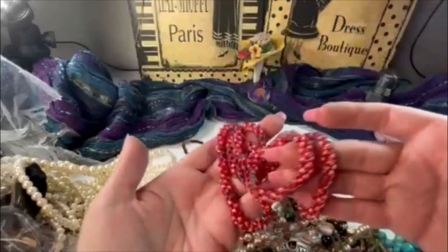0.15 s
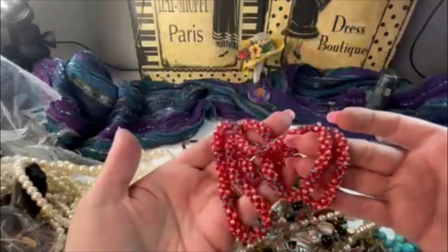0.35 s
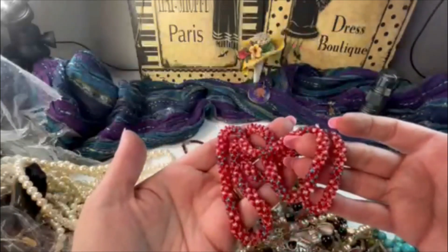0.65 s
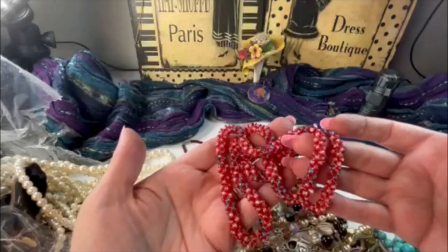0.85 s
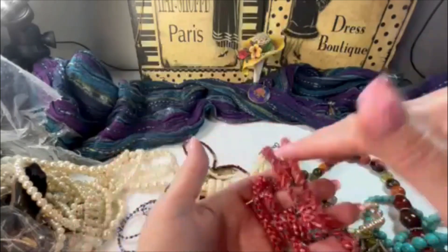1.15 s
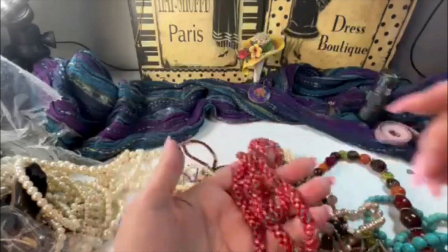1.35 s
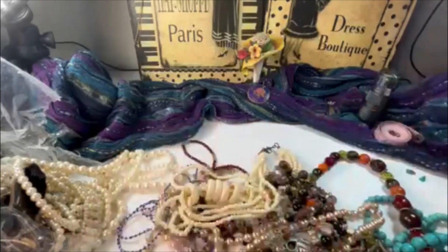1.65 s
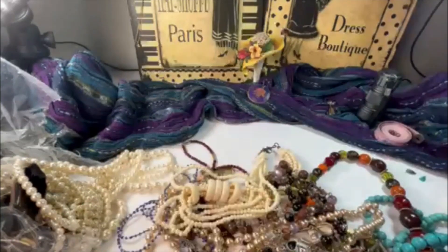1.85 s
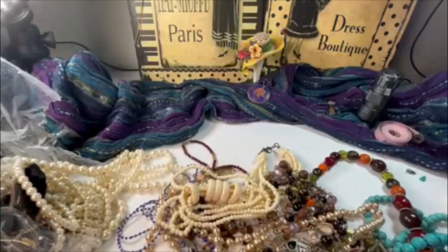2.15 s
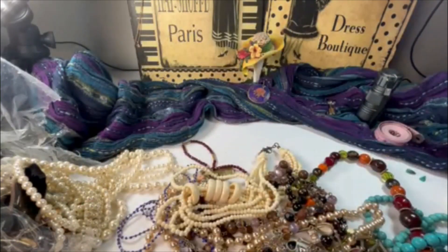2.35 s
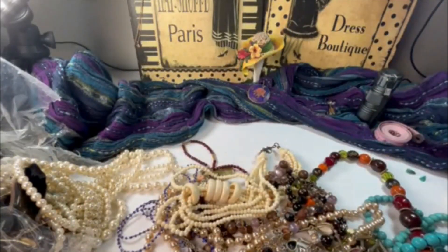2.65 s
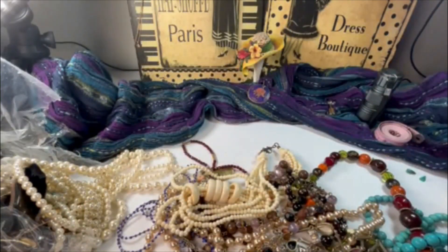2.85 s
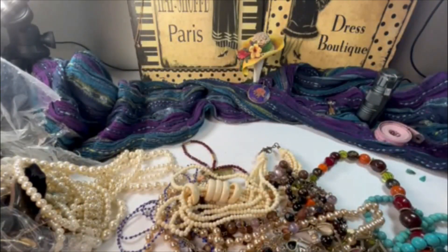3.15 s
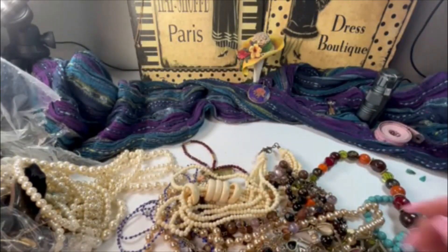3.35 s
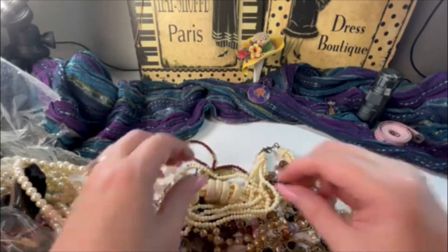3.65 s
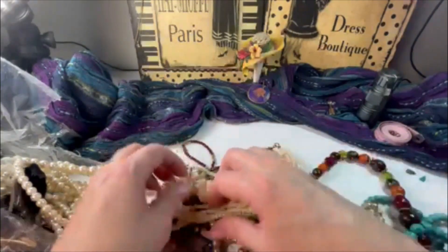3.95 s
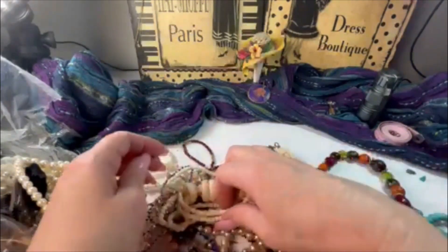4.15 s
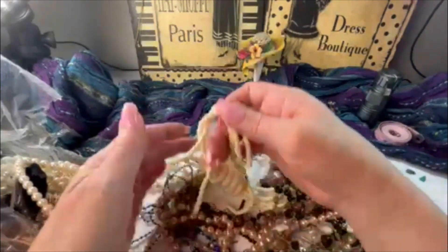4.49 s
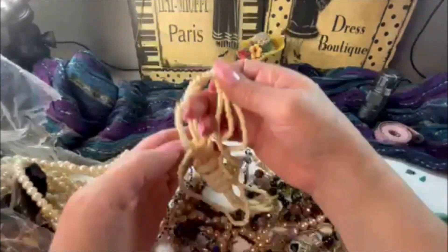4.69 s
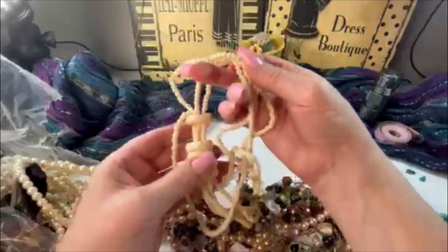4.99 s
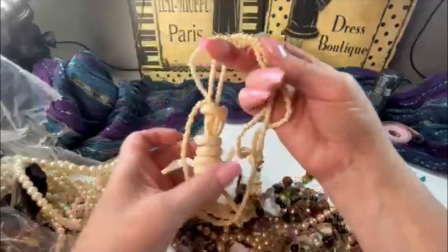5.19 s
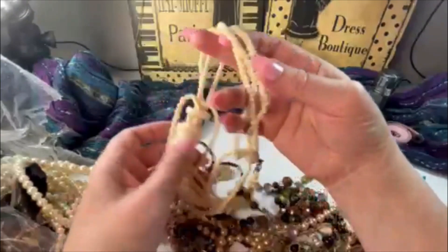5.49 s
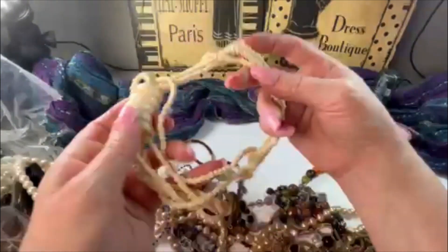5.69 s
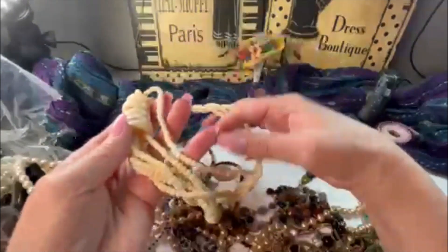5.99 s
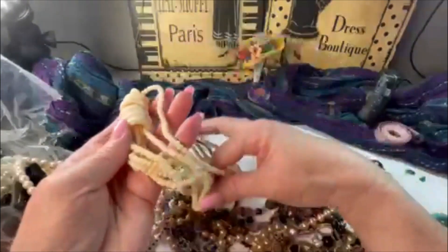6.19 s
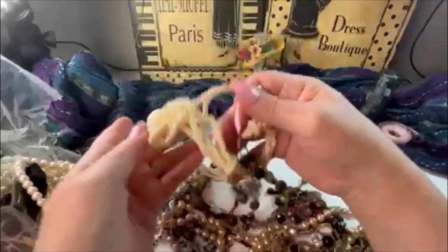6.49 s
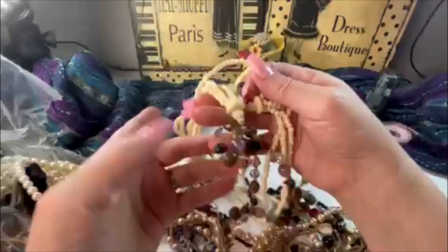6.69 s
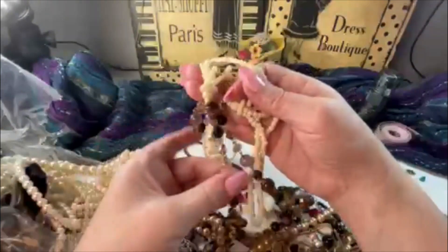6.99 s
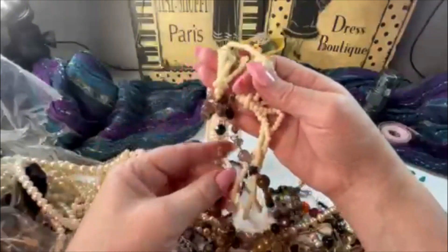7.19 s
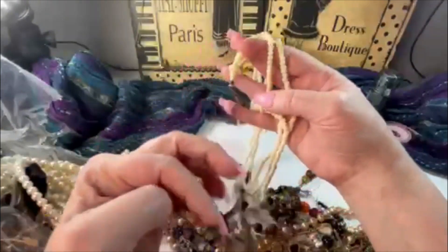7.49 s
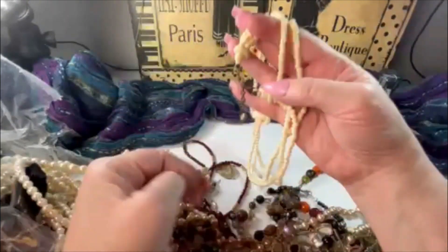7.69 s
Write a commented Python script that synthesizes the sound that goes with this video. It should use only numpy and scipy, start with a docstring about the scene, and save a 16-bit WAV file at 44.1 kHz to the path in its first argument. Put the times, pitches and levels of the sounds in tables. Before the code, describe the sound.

Close on a table in a quiet room, thin plastic beads tick sparsely in the hands, then a string is put down with a soft low thump and a brief brush. A near-silent pause follows. Hands return to the pile, and bright bead clicks, sliding rattles and small knocks on the tabletop come in uneven bursts, densest at the end.

```python
"""A table top in a quiet room, close to a pair of microphone ports: hands turn over strings of plastic beads.
Beads click in clumps of short decaying modes, strings slide as swarms of tiny contacts, and heavier beads
knock the modes of the board; one string is laid aside with soft thumps, skin and cord brush as filtered noise.
Low room rumble, faint hiss and a thin steady whine lie underneath; a short diffuse tail gives the walls."""
import sys
import numpy as np
from scipy import signal
from scipy.io import wavfile

SR = 44100
rng = np.random.default_rng(int(sys.argv[2]) if len(sys.argv) > 2 else 0)


def dump(signal):
    """Clip the signal to [-1, 1] and save it as 16-bit WAV at the path in sys.argv[1]."""
    limited = np.clip(np.atleast_2d(signal).T, -1, 1)
    pcm = np.round(limited * 32767).astype(np.int16)
    wavfile.write(sys.argv[1], SR, pcm)


N = 345744

# modes of the table top: (frequency [Hz], relative strength [dB], t60 [s])
BOARD_MODES = [(143.6, 3, 0.091), (213.72, 5, 0.074), (350, 3, 0.038), (427, 2, 0.043), (603.6, 4.5, 0.035),
               (651, 5.5, 0.017), (807, -3.5, 0.037), (956, 1, 0.019), (1270, 0.5, 0.0097),
               (1500, -0.5, 0.018), (1833, 6.5, 0.0095), (2270, 6, 0.0084), (3100, 8, 0.0051)]

SPOT_FALL_DB, SPOT_MOST_DB = 6, 7   # loss of a mode one octave off the favoured pitch; its limit
BEAD_FALL_DB = 56                   # the same loss for bead modes
KNOCK_MOST_DB = 12.5                # higher limit: knocks and the pile keep closer to their pitch


def from_db(db):
    """Level: decibels to amplitude gain."""
    return 10 ** (np.asarray(db) / 20)


def rms_one(x):
    """Normalisation: scale to rms 1."""
    return x / np.sqrt(np.mean(x ** 2) + 1e-20)


def at_hz(points, hz):
    """Spectral interpolation on a log-frequency axis."""
    points = np.array(points)
    return np.interp(np.log(hz), np.log(points[:, 0]), points[:, 1])


def drift(rate_hz):
    """Random modulation: noise through two equal low-pass poles at rate_hz, scaled to rms 1."""
    r = np.exp(-80 * np.pi * rate_hz / SR)   # computed at every 40th sample
    slow = signal.lfilter([1], [1, -2 * r, r * r], rng.standard_normal(N // 40 + 2002))
    slow = slow[2000:]   # drop the filter's start
    return np.interp(np.arange(N) / 40, np.arange(len(slow)), rms_one(slow))


def high_pass(x, hz):
    """Radiation: small bodies radiate little low sound."""
    return signal.sosfilt(signal.butter(2, hz, "high", fs=SR, output="sos"), x)


def bands():
    """Partial coherence: third-octave noise bands from a common mid and an opposed side; neighbours unrelated."""
    # coherence of the channels: (frequency [Hz], left-right correlation [-1 to 1])
    likeness = [(40, 0.86), (90, 1), (180, 0.49), (500, 0), (5000, 0), (15000, 0.26)]
    edges = 25 * 2 ** np.arange(0, 9.6, 1 / 3)
    white = rng.standard_normal((2, 2, N))
    for k, (low, high) in enumerate(zip(edges, edges[1:])):
        band = signal.butter(2, [low, high], "band", fs=SR, output="sos")
        mid, side = signal.sosfilt(band, white[k % 2])
        hz = np.sqrt(low * high)
        alike = np.clip(at_hz(likeness, hz), -1, 1)
        yield hz, np.sqrt(1 + alike) * mid + np.sqrt(1 - alike) * side * [[1], [-1]]


def room_tone():
    """Ambient noise: a spectrum shaped in bands, whose rumble swells and sinks under a steady hiss."""
    # spectrum of the room: (frequency [Hz], relative density [dB per Hz])
    spectrum = [(25, -24), (40, -6.5), (57, 6), (75, -1.5), (95, 2), (130, -15), (200, -27), (320, -36.5),
                (700, -41.5), (2000, -46), (6000, -52), (10000, -57.5), (13000, -55), (15500, -104)]
    # swell of the rumble: (time [s], rms level [dB])
    rumble_level = [(0.0, -55), (0.59, -59.5), (1.64, -53), (2.27, -57), (7.84, -56)]
    reference_db = -51.5   # the hiss keeps its balance to a rumble of this level
    rumble, hiss = 0, 0
    for hz, noise in bands():
        shaped = from_db(at_hz(spectrum, hz)) * noise
        if hz < 130:
            rumble = rumble + shaped
        else:
            hiss = hiss + shaped
    rumble_db = np.interp(np.arange(N) / SR, *np.transpose(rumble_level))
    return (from_db(rumble_db) * rumble + from_db(reference_db) * hiss) / np.std(rumble)


def whine():
    """Pure tone: one steady sine, its level given as rms."""
    hz, rms_db = 12360, -86.5
    return from_db(rms_db) * np.sqrt(2) * np.sin(2 * np.pi * hz * np.arange(N) / SR)


def ring(x, hz, t60):
    """Damped resonance: a unit click sets a sine of starting height 1 ringing, 60 dB down after t60."""
    r, w = from_db(-60 / (t60 * SR)), 2 * np.pi * hz / SR
    return signal.lfilter([0, np.sin(w)], [1, -2 * r * np.cos(w), r * r], x + 1e-18)


def strike(modes, at, size, pan_db, lag, spread_db, spot_hz=None, fall_db=SPOT_FALL_DB, most_db=SPOT_MOST_DB):
    """Modal excitation: each contact drives every mode by its own strength; the right lags (in samples)."""
    out = np.zeros((2, N))
    own = np.tanh(rng.standard_normal((len(at), len(modes))))
    late = np.clip(at + np.round(lag).astype(int), 0, N - 1)
    for k, (hz, mode_db, t60) in enumerate(modes):
        off_db = 0
        if spot_hz is not None:   # the loss grows with the square of the distance in octaves
            off_db = np.minimum(fall_db * np.log2(hz / spot_hz) ** 2, most_db)
        blow = (-1) ** k * size * from_db(mode_db + spread_db * own[:, k] - off_db)
        train = np.zeros((2, N))
        np.add.at(train[0], at, blow * from_db(pan_db / 2))   # positive pan favours the left
        np.add.at(train[1], late, blow * from_db(-pan_db / 2))
        out += ring(train, hz, t60)
    return out


def beads(at, small_db, large_db, spread_db, spot_hz=None, thin_hz=None):
    """Modal ringing: thin treble nearly centred, with little delay between channels; fuller clack to the left."""
    # modes of small and of large beads, each: (frequency [Hz], relative strength [dB])
    small_table = [(8700, 0.5), (9600, 4), (10500, 5), (11300, 7), (12100, 7.5), (12900, 2), (13900, -14.5),
                   (15000, -44)]
    large_table = [(2700, -8.5), (3400, -7), (4100, -3), (4700, -2), (5300, 0), (6000, -2.5), (6600, 1),
                   (7400, -1.5)]
    small_cycles, large_cycles = 19, 22   # cycles of ringing to -60 dB
    small_modes = [(hz, db, small_cycles / hz) for hz, db in small_table]
    large_modes = [(hz, db, large_cycles / hz) for hz, db in large_table]
    place = rng.standard_normal((len(at), 5))
    sign, pan_db = np.sign(place[:, 4]), 2 * place[:, 2]
    small_lag, large_lag = 0.63 * place[:, 0], 18.0 + 9.0 * place[:, 1]
    small = strike(small_modes, at, sign * from_db(small_db), pan_db - .8, small_lag, spread_db,
                   thin_hz, BEAD_FALL_DB)
    large = strike(large_modes, at, sign * from_db(large_db), pan_db + 5.0, large_lag, spread_db,
                   spot_hz, BEAD_FALL_DB)
    return high_pass(small, 5500.0) + high_pass(large, 1500)


def board(at, level_db, spread_db, spot_hz, most_db=SPOT_MOST_DB):
    """Plate modes: blows of either sign on the table top, mostly left of the ports."""
    place = rng.standard_normal((len(at), 3))
    size = np.sign(place[:, 2]) * from_db(level_db)
    pan_db, lag = 1.3 + 1.66 * place[:, 0], 21.1 + 15.8 * place[:, 1]
    return strike(BOARD_MODES, at, size, pan_db, lag, spread_db, spot_hz, most_db=most_db)


def clumps(s, count, gap_s, fade_db_s, lead_db):
    """Clustered impacts: each touch is a short burst: a fainter onset, the main contact, then fading ones."""
    luck = rng.random((len(s), 2, count))
    delay = np.cumsum(0.0004 + gap_s * luck[:, 0] ** 2, axis=1)
    delay = delay - delay[:, 1:2]   # the second contact is the main one
    loss_db = -(lead_db + 10 * luck[:, 1] + fade_db_s * delay + 3 * (delay < 0))
    loss_db[:, 1] = 0
    at = np.clip(((s[:, None] + delay) * SR).astype(int), 0, N - 1)
    return at.ravel(), loss_db


def click_clumps(s, small_db, large_db, spot_hz):
    """Clustered impacts: a click is a short burst of contacts; its small beads share one chance pitch."""
    at, loss_db = clumps(s, count=7, gap_s=0.0014, fade_db_s=1100.0, lead_db=6)
    thin_hz = np.repeat(rng.uniform(10940, 12950, len(s)), 7)
    small_db = (small_db[:, None] + loss_db).ravel()
    large_db = (large_db[:, None] + loss_db).ravel()
    return beads(at, small_db, large_db, 4.34, np.repeat(spot_hz, 7), thin_hz)


def tugs(stretch, share):
    """Energy addition: tugs swell and die, ever faster far from the peak; overlapping powers add."""
    # pulls at the strings: (peak time [s], small-bead level [dB], rise [s], fall [s],
    # drag on the board [dB over the small beads, before share]); stretch lengthens the fall
    pulls = [(0.031, -72.5, 0.12, 0.058, -0.5), (0.33, -84, 0.033, 0.22, -6),
             (1.099, -76.5, 0.11, 0.27, 0.5), (1.33, -74, 0.12, 0.046, -21),
             (1.53, -65.5, 0.011, 0.029, 18.5), (1.596, -57.5, 0.027, 0.051, 16.5),
             (1.75, -67, 0.052, 0.036, 4.5), (1.931, -84, 0.015, 0.066, 23.5),
             (3.508, -60, 0.012, 0.062, 9.5), (3.685, -62.5, 0.066, 0.12, 12.5),
             (3.93, -61.5, 0.051, 0.056, 18), (4.055, -45, 0.072, 0.043, 3.5),
             (4.16, -63.5, 0.057, 0.11, 7), (4.256, -52, 0.033, 0.097, 4.5), (4.42, -57, 0.26, 0.098, 8),
             (4.552, -50.5, 0.084, 0.031, 4.5), (4.681, -47, 0.11, 0.053, 0.5),
             (4.912, -43.5, 0.093, 0.13, 1), (5.1, -59, 0.082, 0.11, -12), (5.27, -46.5, 0.11, 0.037, -5.5),
             (5.38, -55.5, 0.023, 0.024, 8), (5.582, -48.5, 0.049, 0.17, 3), (5.77, -49, 0.17, 0.089, -7),
             (6, -53, 0.055, 0.049, -27), (6.11, -51, 0.062, 0.065, -0.5), (6.252, -53, 0.032, 0.075, 1),
             (6.37, -45.5, 0.066, 0.042, -11), (6.504, -49, 0.096, 0.17, 0), (6.744, -41, 0.076, 0.035, -2),
             (6.852, -43.5, 0.061, 0.042, 2.5), (6.97, -63.5, 0.046, 0.06, 0),
             (7.042, -53.5, 0.057, 0.03, -4.5), (7.166, -54, 0.044, 0.078, 0.5),
             (7.33, -57.5, 0.1, 0.066, -3), (7.427, -46, 0.089, 0.22, -4.5),
             (7.632, -37.5, 0.047, 0.073, 3), (7.717, -40, 0.033, 0.032, 7)]
    edge_db = 9   # loss one rise before or one fall after the peak
    t, power = np.arange(0, N, 20) / SR, 1e-14
    for s, peak_db, rise, fall, drag_db in pulls:
        away = np.where(t < s, (s - t) / rise, (t - s) / (fall * stretch))
        loss_db = edge_db * away * np.maximum(away / 2, 1)
        power = power + from_db(peak_db + share * drag_db - loss_db) ** 2
    return np.interp(np.arange(N) / SR, t, 10 * np.log10(power))


def rattle():
    """Stochastic friction: sliding strings make swarms of tiny random contacts, lesser clicks and board drag."""
    contacts_per_s, lesser_per_s = 2800, 26   # contacts before thinning and swarming; lesser clicks
    sparser = .6                              # dB of contact rate lost per dB of gentler tug
    lesser_over_db = 10.5                     # lead of the lesser clicks over the tug
    large_share_db, large_follows_drag = -0.5, 0.21   # large beads join in with the drag
    drag_base_hz, drag_sinks = 1014, 0.021    # pitch a drag of 0 dB favours; octaves lower per dB of drag

    small_db = tugs(1, 0)
    board_db = tugs(1.014, 0.97)   # the board lingers a little
    drag_db = board_db - small_db
    large_db = small_db + large_share_db + large_follows_drag * drag_db
    moving = small_db > -100

    thin_db = np.clip(sparser * (small_db + 50.0), -11.0, 0)
    rate = contacts_per_s * from_db(thin_db + 4.0 * drift(35.0))
    at = np.flatnonzero((rng.random(N) < rate / SR) & moving)
    # sparser contacts are each stronger
    size_db = 1.55 * np.minimum(rng.exponential(1, N), 5) + 1.86 * drift(16.0) - thin_db / 2
    sliding = beads(at, (size_db + small_db)[at] - 10.0, (size_db + large_db)[at] - 11.5, spread_db=11.5)

    snap = np.flatnonzero((rng.random(N) < lesser_per_s / SR) & moving)
    lead_db = lesser_over_db + 7.1 * np.tanh(rng.standard_normal((len(snap), 2)))
    lesser = click_clumps(snap / SR, small_db[snap] + lead_db[:, 0], large_db[snap] + lead_db[:, 1] + 1.5,
                          rng.uniform(3900, 14000, len(snap)))

    drag_hz = drag_base_hz * 2 ** (-drag_sinks * drag_db[at])
    return sliding + lesser + board(at, (size_db + board_db)[at] - 21.0, 9.06, drag_hz)


def clear_clicks():
    """Impact excitation: the clicks that stand out, each with a colour of its own."""
    # clearest single clicks: (time [s], small beads [relative dB], large beads [relative dB],
    # pitch the large beads favour [Hz])
    click_table = [(0.0093, -41.5, -59, 7500), (0.038, -44.5, -58, 7060), (0.299, -48, -62, 2990),
                   (0.316, -49, -53.5, 7170), (0.3565, -45, -55.5, 7580), (0.8981, -52, -71, 7560),
                   (0.951, -44, -77, 7580), (1.0156, -36.5, -68, 5360), (1.0332, -38, -49, 5630),
                   (1.0804, -45, -60, 5560), (1.109, -43, -51.5, 2970), (1.1789, -41.5, -59, 6800),
                   (1.185, -62, -53, 3300), (1.2829, -38, -51.5, 6780), (1.3018, -36, -50.5, 5275),
                   (1.5979, -34, -40.5, 6060), (1.8915, -51, -55, 4690), (2.3812, -64, -66, 7125),
                   (3.5053, -35.5, -40, 4417), (3.5134, -39, -42.5, 4207), (3.689, -52, -31.5, 3672),
                   (3.8255, -40.5, -44.5, 3380), (3.871, -39, -48, 4150), (3.92, -54, -42, 6430),
                   (3.943, -35, -35, 5140), (3.948, -33, -40, 6500), (3.9629, -32, -28.5, 6500),
                   (3.9951, -36, -38, 3750), (4.053, -32.5, -33, 5043), (4.0615, -25, -28, 6404),
                   (4.1017, -38, -37.5, 5503), (4.2252, -33, -42, 5754), (4.2338, -34, -37, 4892),
                   (4.2563, -25, -29.5, 7255), (4.3715, -35, -38.5, 3400), (4.3945, -29.4, -38, 6800),
                   (4.4914, -33, -45, 2835), (4.534, -29, -54, 7140), (4.544, -31, -44, 4427),
                   (4.564, -34, -27.5, 3904), (4.852, -35, -39, 7444), (4.854, -30, -29, 3530),
                   (4.9062, -28.5, -36, 4662), (4.9825, -32, -32, 7170), (5.0415, -37, -44, 5940),
                   (5.061, -41, -38.5, 5720), (5.1513, -29, -40, 5217), (5.2435, -31, -35, 7530),
                   (5.267, -26.5, -35.5, 6650), (5.2926, -32, -48, 6610), (5.2994, -28, -42, 6586),
                   (5.3236, -32, -38.5, 5343), (5.371, -31.5, -36.5, 3546), (5.4805, -41, -57, 6957),
                   (5.493, -46, -44, 3008), (5.505, -52, -43, 6695), (5.518, -48, -45, 6444),
                   (5.5382, -36, -43, 6935), (5.555, -30, -45, 4230), (5.6473, -26, -34, 4146),
                   (5.6617, -21, -30, 6574), (5.6729, -30, -42, 6660), (5.6996, -36, -33.2, 6943),
                   (5.7435, -32, -41, 6758), (5.7515, -32, -39, 6042), (5.8118, -32, -41, 4353),
                   (5.8341, -35, -51, 4783), (5.8885, -21.5, -24.5, 5267), (5.8952, -29, -27.5, 3533),
                   (5.913, -33, -40, 5386), (5.983, -33, -39, 2610), (5.994, -34, -43, 6900),
                   (6.0027, -36, -45, 7590), (6.071, -38.5, -35, 5726), (6.0865, -23, -33, 4788),
                   (6.1153, -33, -33, 7486), (6.2302, -18.5, -28.5, 4720), (6.2343, -27, -26.5, 5424),
                   (6.2487, -33, -30.5, 6990), (6.3618, -32, -30, 6320), (6.373, -32, -34, 5280),
                   (6.3852, -40, -33, 7346), (6.4403, -33, -44.6, 7540), (6.467, -32, -35.5, 5216),
                   (6.4927, -20.5, -21.5, 5483), (6.5004, -25, -29, 7607), (6.5092, -23.5, -44, 7080),
                   (6.5555, -32, -47, 7500), (6.5659, -30, -42, 7553), (6.5855, -28.5, -28.5, 5687),
                   (6.6006, -30, -37, 4496), (6.667, -32, -44, 5130), (6.7464, -21.5, -33.7, 6196),
                   (6.7624, -24, -36, 5470), (6.8, -31, -47, 7456), (6.8431, -29, -25.5, 6397),
                   (6.8546, -29.5, -32.5, 5982), (6.9212, -37, -36.5, 6900), (7.0315, -34, -42, 7360),
                   (7.0509, -37.5, -45, 6987), (7.1774, -33.5, -37, 7097), (7.2192, -37, -36, 4337),
                   (7.2503, -31, -31, 6353), (7.283, -25.5, -39, 7220), (7.3304, -43, -35.5, 3360),
                   (7.372, -32, -34.5, 4035), (7.4077, -23.5, -36, 4328), (7.417, -26, -27, 6776),
                   (7.4235, -22, -31, 5325), (7.432, -23, -34, 4540), (7.4635, -18.2, -21, 6330),
                   (7.5086, -24.5, -29, 2614), (7.5735, -35, -44, 7250), (7.5928, -27, -29, 4890),
                   (7.598, -18, -28, 4275), (7.605, -29, -19.5, 6986), (7.6144, -25.5, -30, 3977),
                   (7.6427, -38, -20, 5343), (7.6549, -43, -22, 4600), (7.6889, -27, -21.5, 5340),
                   (7.696, -22, -26, 4822), (7.7146, -33, -26, 4190), (7.722, -22, -28, 4870),
                   (7.7281, -23, -32, 6850), (7.7651, -25, -24.5, 4860), (7.7987, -27, -38, 4833)]
    s, small_db, large_db, spot_hz = np.transpose(click_table)
    return click_clumps(s, small_db + 4.0, large_db + 1.06, spot_hz)


def knocks():
    """Soft impact: heavier beads drive the board in bursts, and the struck spot rings at its own pitch."""
    # knocks on the board: (time [s], strength [relative dB], pitch the spot favours [Hz])
    knock_table = [(1.525, -41, 620), (1.57, -34, 575), (1.605, -50, 1530), (1.618, -31, 960),
                   (1.622, -30, 1480), (1.618, -32, 644), (1.637, -32, 570), (1.923, -41.5, 2890),
                   (1.951, -47, 2700), (1.926, -62, 480), (3.515, -48, 610), (3.708, -46, 890),
                   (3.841, -39, 1996), (3.916, -38, 633), (3.997, -45, 595.7), (4.156, -42.5, 975),
                   (4.527, -38, 1181), (4.563, -27, 2000), (4.622, -30.5, 1551), (4.63, -32.5, 654.6),
                   (4.904, -32, 611), (4.934, -34, 1517), (5.062, -39, 1786), (5.094, -32.5, 1457),
                   (5.14, -39, 1934), (5.237, -39, 2400), (5.747, -37.5, 1730), (5.782, -36, 1779),
                   (5.892, -36.5, 1044), (6.49, -41.5, 2240), (6.663, -42.5, 582.4), (6.719, -34.5, 779.5),
                   (6.749, -34.5, 1817), (6.841, -36, 928), (6.853, -35, 910), (7.416, -39.5, 591),
                   (7.581, -36, 614.6), (7.597, -19, 622.5), (7.642, -25, 859.6), (7.699, -31, 710),
                   (7.763, -32.5, 993)]
    soft_hz = 3880                  # low-pass of the soft contact
    tone_db, lingers = -3.5, 1.44   # the spot's own tone; its t60 over that of the board there
    s, peak_db, spot_hz = np.transpose(knock_table)
    at, loss_db = clumps(s, count=6, gap_s=0.0045, fade_db_s=262.0, lead_db=6)
    level_db = peak_db[:, None] + loss_db
    blows = board(at, (level_db - 9.0).ravel(), 3.7, np.repeat(spot_hz, 6), KNOCK_MOST_DB)
    board_t60 = np.array(BOARD_MODES)[:, ::2]
    for row, row_db, hz in zip(at.reshape(loss_db.shape), level_db, spot_hz):
        spot = [(hz, tone_db, lingers * at_hz(board_t60, hz))]
        # the main contact and the next one sound the spot
        blows = blows + strike(spot, row[1:3], from_db(row_db[1:3]), 2.0, np.full(2, 12.0), 0)
    return signal.sosfilt(signal.butter(1, soft_hz, fs=SR, output="sos"), blows)


def thumps():
    """Low-frequency bending: a string or hand lands as a slow push that excites two low modes of the table."""
    # landings: (time [s], strength [relative dB], pitch of the upper mode [Hz])
    landings = [(1.567, -33, 115), (1.587, -26.5, 118), (3.529, -43, 149.8), (3.622, -42.5, 125),
                (3.645, -41, 108.7), (3.883, -39, 140)]
    out = np.zeros(N)
    for s, strength_db, hz in landings:
        push, start = np.zeros(N), int(s * SR)
        push[start:start + 130] = from_db(strength_db) * np.hanning(130) / 65   # a 3 ms push
        out += ring(push, 65, .09) + ring(push, hz, .08)
    return high_pass(out, 55)


def in_time(tables):
    """Envelope interpolation: spells on one time axis, the first column falling to silence between them."""
    rows = []
    for table in tables:
        first, last = table[0], table[-1]
        rows += [(first[0] - .01, -130, *first[2:]), *table, (last[0] + .02, -130, *last[2:])]
    s, *columns = np.transpose(rows)
    return [np.interp(np.arange(N) / SR, s, c) for c in columns]


def brush_colour(hz, centre_hz):
    """Resonant filtering: a hollow peak at the stroke's centre, on a broad hiss that fades at both ends."""
    peak = from_db(-60.0 * np.log2(hz / centre_hz) ** 2)
    return peak + from_db(-5.5 - 1.8 * np.log2(hz / 13000.0) ** 2 - 22.0 * (hz > 13000))


def brush():
    """Friction noise: skin and cord brush as a grainy hiss whose spectral peak moves."""
    # one list per stroke: (time [s], relative level [dB], centre of the peak [Hz])
    strokes = [
        [(1.64, -84, 2400), (1.76, -75, 5500), (1.88, -79.5, 4800)],
        [(1.9, -77, 2740), (1.93, -60, 2627), (1.97, -63.5, 2600), (2.05, -76.5, 2336), (2.12, -94, 1980)],
        [(2.83, -81, 8600), (2.856, -64, 9200), (2.92, -67, 8550), (3.0, -89, 7300)],
        [(3.58, -69, 2208), (3.62, -55.5, 2060), (3.68, -61.5, 2074), (3.72, -63, 4170), (3.8, -73, 4998)],
    ]
    level_db, centre_hz = in_time(strokes)
    hiss = 0
    for hz, noise in bands():
        if hz > 300:
            hiss = hiss + rms_one(noise) * brush_colour(hz, centre_hz)
    return from_db(level_db + 2.2 * drift(93.0)) * hiss


def narrow_hiss():
    """Narrow-band noise: noise twice through one resonance, swelling in and fading."""
    # hisses, the first a thin whistle trailing a stroke: (start [s], end [s], level before fade [dB],
    # fade [dB/s], centre [Hz], width of one resonance [Hz])
    hisses = [(1.93, 2.27, -71, 45, 1790, 170), (3.02, 3.15, -85, 0, 9700, 1500),
              (3.12, 3.32, -67, 45, 9800, 3000)]
    out, t = 0, np.arange(N) / SR
    for start, end, level_db, fade, hz, width in hisses:
        t60 = np.log(1000) / (np.pi * width)
        tone = rms_one(ring(ring(rng.standard_normal(N), hz, t60), hz, t60))
        on = np.clip(np.minimum(t - start, end - t) / .04, 0, 1)   # 40 ms ramps
        fade_db = fade * np.clip(t - start, 0, 1)
        out = out + on * from_db(level_db - fade_db + 2 * drift(20)) * tone
    return out


def pile():
    """Random impacts: the pile shifts under the hands, a low shuffle on the board that is fuller under a tug."""
    from_s, per_s = 3.88, 500
    base_db, favoured_hz = -66.5, 444   # level per contact under a tug of -55 dB
    follows = 0.29                      # share of the tug's swing
    at = np.flatnonzero((rng.random(N) < per_s / SR) & (np.arange(N) > from_s * SR))
    level_db = base_db + follows * (tugs(1, 0)[at] + 55) + 2 * drift(5)[at]
    return board(at, level_db, 4.8, favoured_hz, KNOCK_MOST_DB)


def walls(x):
    """Diffuse reverberation: convolution with decaying noise, independent in each channel."""
    t60_s, level_db = 0.12, -9.5
    t = np.arange(int(.3 * SR)) / SR
    tail = rng.standard_normal((2, len(t))) * from_db(-60 * t / t60_s) * (t > .003)
    tail = tail / np.sqrt(np.sum(tail ** 2, axis=1, keepdims=True))   # unit energy
    return from_db(level_db) * signal.fftconvolve(x, tail, axes=1)[:, :N]


def scene():
    """Superposition: beads and board with their reverberation, over brushing and room."""
    close = rattle() + clear_clicks() + knocks() + thumps() + pile()
    room = room_tone() + whine()
    return room + close + walls(high_pass(close, 207.0)) + brush() + narrow_hiss()


def record(dry):
    """Band limiting: a steep low-pass, 60 dB down from its stop edge upward."""
    stop_hz = 16900
    return signal.sosfilt(signal.cheby2(12, 60, stop_hz, fs=SR, output="sos"), dry)


dry = scene()
out = record(dry)
dump(out)
```